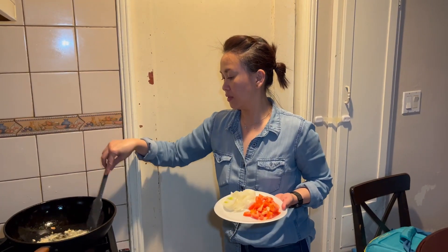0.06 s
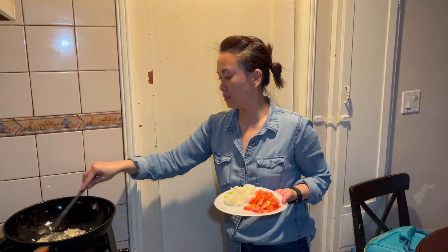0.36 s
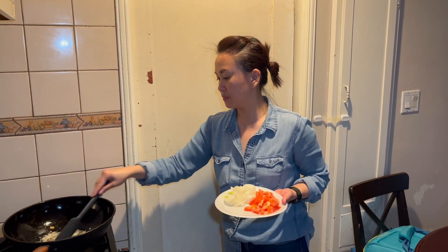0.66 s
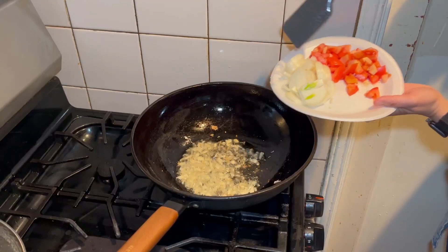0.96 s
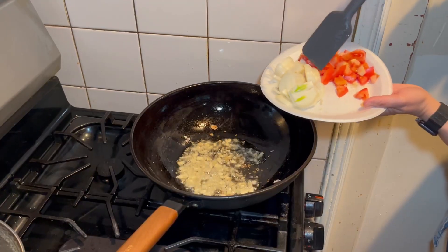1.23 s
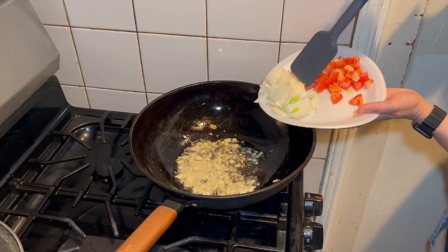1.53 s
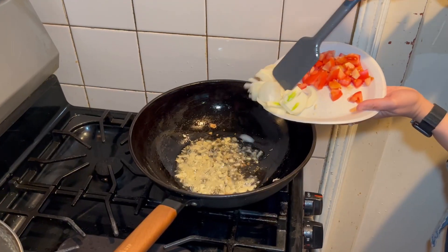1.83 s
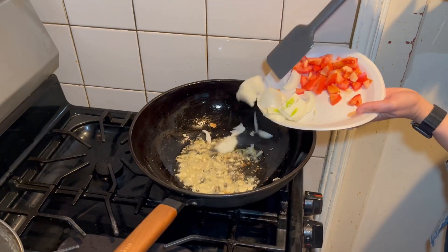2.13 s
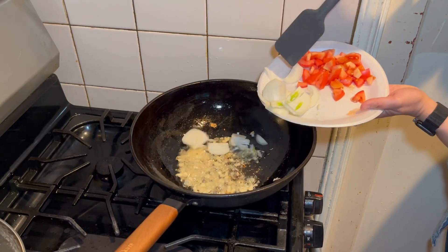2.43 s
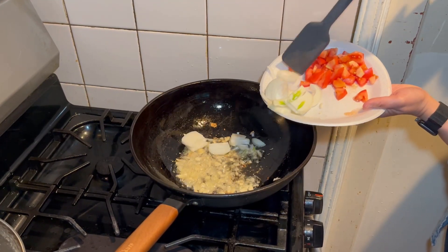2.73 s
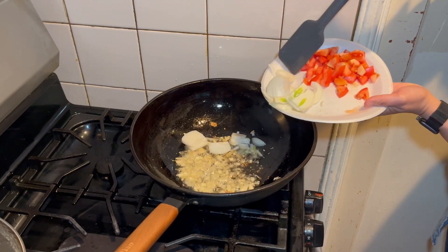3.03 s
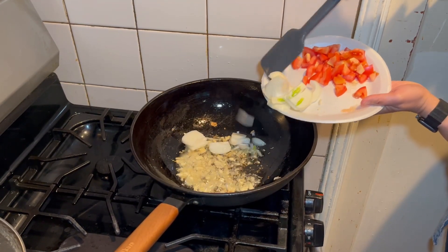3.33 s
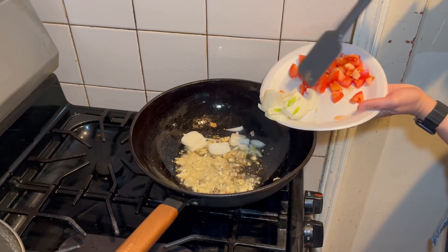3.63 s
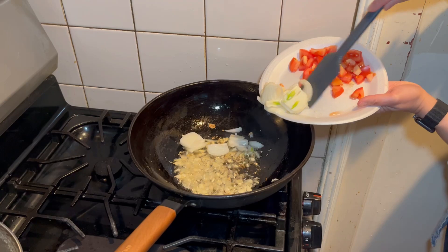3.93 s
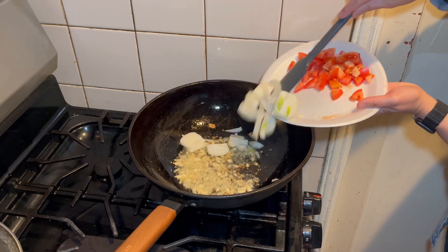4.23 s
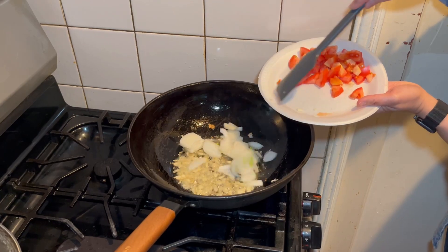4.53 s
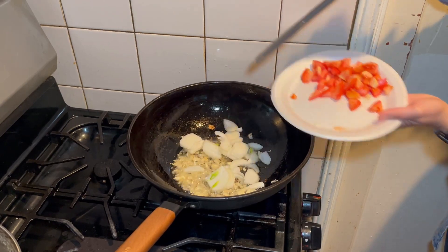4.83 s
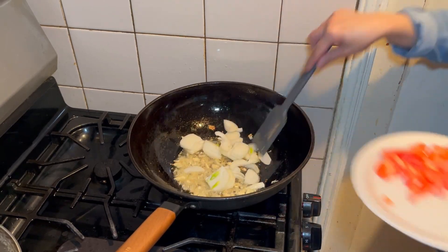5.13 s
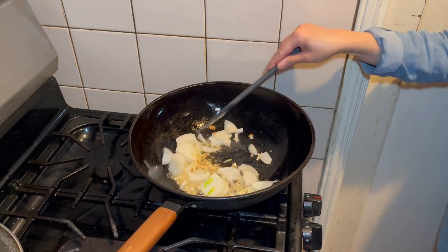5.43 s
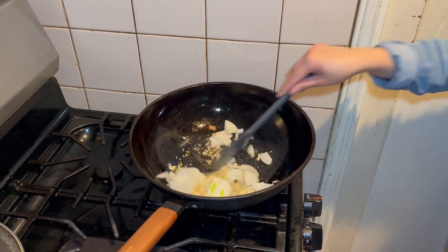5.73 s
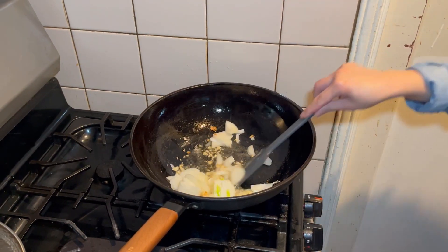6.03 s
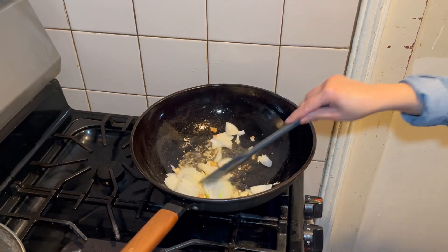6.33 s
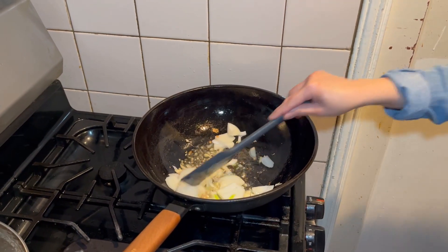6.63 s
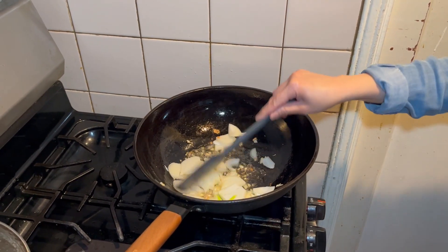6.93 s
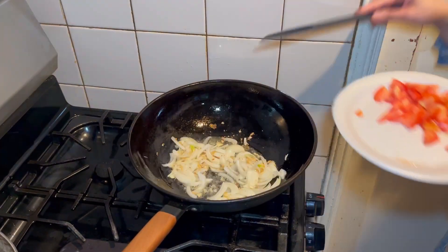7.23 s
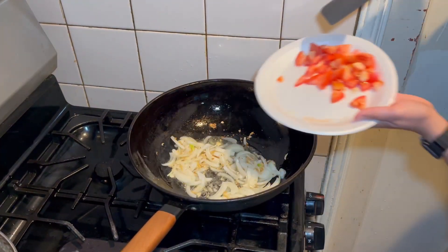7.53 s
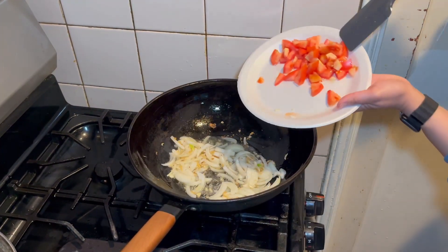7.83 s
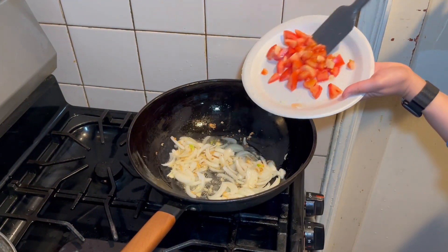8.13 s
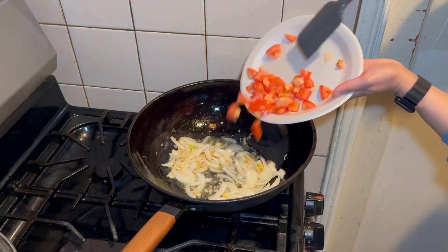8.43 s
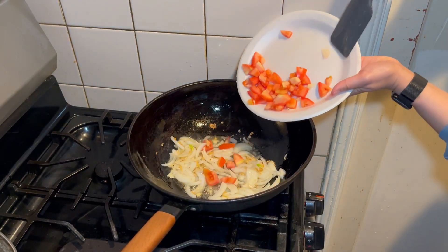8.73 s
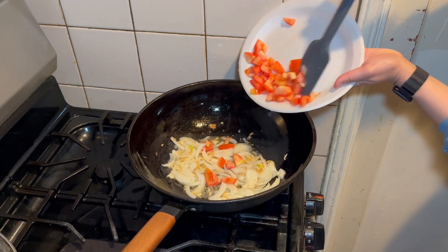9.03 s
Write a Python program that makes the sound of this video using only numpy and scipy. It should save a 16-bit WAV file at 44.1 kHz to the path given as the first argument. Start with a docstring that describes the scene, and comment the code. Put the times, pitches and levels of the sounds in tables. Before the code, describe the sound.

Garlic fizzes softly in a wok, then onion drops in and sizzles loudly with pops and spits as a spatula knocks and stirs.

```python
"""Garlic fizzes softly in a wok, close to a stereo microphone in a small tiled kitchen. Onion goes in at
2 s and the sizzle leaps up: water flashes to steam in the hot oil, with ringing pops and sharp spits.
An abrupt cut at 7.2 s leaves a quieter sizzle; tomato follows. A soft spatula knocks and pushes the food.
Underneath are the burner and, from outside, a rumble, a dull roar and a drone like an idling engine."""
import sys
import numpy as np
from scipy import signal
from scipy.fft import rfft, irfft, next_fast_len
from scipy.io import wavfile

SR = 44100
rng = np.random.default_rng(int(sys.argv[2]) if len(sys.argv) > 2 else 0)


def file_out(sig):
    """Save sig as 16-bit WAV at sys.argv[1]."""
    # one column per channel
    cols = np.atleast_2d(sig).T
    # limit, then scale
    lim = np.clip(cols, -1, 1)
    pcm = np.round(lim * 32767).astype(np.int16)
    wavfile.write(sys.argv[1], SR, pcm)


N = 399987
PADDED = next_fast_len(N + SR // 2)
FREQS = np.maximum(np.arange(PADDED // 2 + 1) * SR / PADDED, 1)

# Levels are relative: each source and the microphone add their own gain.
# spectrum of the frying: freq_hz, level_db
FRY_COLOUR = [(200, -6), (450, -10), (680, -11), (1050, -4), (1800, -3), (2350, -0.5), (3100, 0.5),
              (3750, 3), (5500, 1.6), (6800, 2), (9500, -3), (10800, -4.5), (12200, -9.5), (14000, -7),
              (15500, -21.5)]
# air resonances in the bowl of the wok: freq_hz, width_hz, gain_db
BOWL_RESONANCES = [(638, 45, 12.5), (763, 17, 6), (980, 41, 6), (1170, 80, -0.5), (2390, 130, 2.5),
                   (3766, 190, 3), (4940, 190, 3.5)]
# moist garlic, onion, then tomato meets hot oil: start_s, length_s, large_db, small_db, spray_db
WETTINGS = [ (0.0, 0.67, -75.5, -58, -61), (1.774, 0.38, -55, -55, -50), (2.047, 6.4, -41.5, -36, -40.5),
            (2.06, 0.6, -58, -57, -38), (2.29, 0.52, -41, -34, -41.5), (5.243, 0.32, -56, -57, -36),
            (5.747, 1.36, -41, -33, -39.5), (6.66, 0.5, -39, -49, -58), (8.5, 0.17, -60, -45, -43.5),
            (8.877, 0.18, -46, -35.5, -67)]
# steady sizzle of the garlic, and the sizzle after the abrupt cut: large_db, small_db, spray_db
GARLIC_DB, AFTER_CUT_DB = (-58, -52, -61), (-47.5, -39, -48)
# bubbles need time to grow, spray starts at once: large_s, small_s, spray_s
BUILD_S = (0.085, 0.069, 0.018)
DRY_OFF_S, CUT_S = 0.27, 7.224   # time constant of a dying flare; moment of the cut
# the largest steam bubbles bursting: start_s, level_db, pitch_hz, ring_cycles
POPS = [(0.9343, -31.5, 4230.0, 48), (2.2015, -22.0, 6400.0, 12.0), (2.4226, -19.5, 2480.0, 8.8),
        (2.506, -20, 5690.0, 22), (2.697, -20.5, 2400.0, 8.0), (2.7286, -27, 4230.0, 30),
        (2.7788, -20, 3980.0, 22), (2.7961, -10, 2660, 14), (2.8037, -15, 5700, 22),
        (2.909, -22.5, 3300, 22), (2.9438, -21.5, 2480.0, 8.8), (3.0504, -23, 5860.0, 30),
        (3.1004, -18.0, 3140.0, 12.0), (3.1701, -15.5, 3980.0, 8.0), (3.4724, -19, 4620.0, 12.0),
        (3.5433, -20.5, 3730, 18.0), (3.5692, -22, 5860.0, 22), (3.6974, -19, 2940, 22),
        (3.8061, -16, 5520.0, 12.0), (4.029, -24.0, 5050.0, 30), (4.0481, -24, 3750.0, 8.0),
        (4.0615, -22.5, 3540.0, 18.0), (4.1842, -22.0, 6800.0, 22), (4.2397, -26, 2480.0, 8.0),
        (4.2894, -22, 4760.0, 18.0), (4.5643, -26, 3640.0, 22), (4.6203, -23.0, 3750.0, 18.0),
        (4.6522, -13.5, 4300, 22), (4.849, -22, 4350.0, 30), (4.9414, -19.0, 3540.0, 12.0),
        (4.9984, -16.5, 5860.0, 18.0), (5.6697, -20, 6600.0, 18.0), (5.8216, -22, 3640.0, 22),
        (5.8598, -25.0, 3700, 30), (5.9233, -22.0, 3750.0, 30), (5.9285, -21, 3750.0, 30),
        (6.0767, -13, 3650, 29), (6.4898, -15, 5050.0, 18.0), (6.7836, -22.0, 3540.0, 24),
        (7.1118, -18.0, 3640.0, 22), (7.3473, -20.5, 4350.0, 12.0), (7.413, -20.5, 4230.0, 30),
        (7.4215, -26, 3900, 14), (7.602, -22, 6200, 30), (7.6033, -24, 4600, 21), (7.671, -24, 6400.0, 30),
        (7.722, -20.5, 3640.0, 18.0), (7.843, -26, 3750.0, 30), (7.9222, -28, 4100.0, 12.0),
        (8.0321, -27.0, 4100.0, 22), (8.0605, -22.5, 3750.0, 30), (8.189, -19.5, 5760, 22),
        (8.2314, -24, 5690.0, 30), (8.3939, -22.5, 4230.0, 22), (8.9123, -23, 4230.0, 22),
        (8.931, -27.0, 4600, 33), (8.9821, -19, 4200, 33), (9.0468, -21.5, 5360.0, 22)]
# oil spitting: start_s, level_db
SPITS = [(0.0845, -33), (0.6779, -34.0), (1.0204, -33), (1.8669, -24), (1.9119, -32.5), (1.9805, -26),
         (2.0623, -16.5), (2.1029, -11), (2.1878, -19), (2.2063, -13.5), (2.214, -17), (2.2212, -16),
         (2.2306, -12), (2.3427, -10), (2.4813, -11), (2.5395, -9), (2.5563, -12), (2.5968, -11),
         (2.723, -11), (2.7787, -15.0), (2.844, -17.0), (2.9241, -15.0), (3.015, -6.5), (3.0997, -19),
         (3.1773, -13), (3.1899, -17), (3.3426, -13.0), (3.3728, -16), (3.3773, -13), (3.482, -10.5),
         (3.5143, -12), (3.6344, -9.5), (3.772, -12.5), (3.7847, -15), (3.8059, -19.0), (3.8273, -16),
         (3.837, -9), (4.0061, -18), (4.0617, -15), (4.0788, -18.0), (4.1994, -14), (4.3483, -20),
         (4.4786, -12.0), (4.6641, -11.5), (4.721, -13), (4.8478, -13.5), (4.8711, -17.0), (5.1152, -16.5),
         (5.4583, -12), (5.5721, -10.5), (6.2707, -16), (6.6151, -10), (6.6898, -15.0), (6.838, -8.5),
         (6.872, -14), (6.9395, -15), (7.049, -14), (7.114, -13), (7.1597, -8.0), (7.1848, -9.5),
         (7.5682, -27), (7.8254, -18), (7.9589, -22), (8.4476, -23.0)]
# a wet patch touches the oil: start_s, length_s, level_db, pitch_hz
FLURRIES = [(0.065, 0.06, -46, 6000), (0.15, 0.12, -48.5, 5000), (0.44, 0.069, -50, 4800),
            (0.56, 0.08, -53, 5200), (0.66, 0.08, -54, 5000), (1.08, 0.04, -50, 5500),
            (2.414, 0.033, -38, 2650), (2.467, 0.057, -28.5, 5800), (2.72, 0.031, -46, 2600),
            (3.1, 0.093, -34.5, 2900), (3.463, 0.041, -37, 4000), (3.756, 0.063, -35.5, 2780),
            (4.023, 0.059, -32.5, 3600), (4.387, 0.043, -31, 5800), (4.548, 0.033, -41, 2730),
            (4.713, 0.029, -35, 2800), (4.939, 0.04, -41, 2600), (5.004, 0.056, -35, 3020),
            (6.25, 0.52, -33.5, 4150), (6.678, 0.42, -39, 4100), (8.612, 0.06, -38, 4400)]
# spatula touching wok or plate: start_s, level_db, pitch_hz
KNOCKS = [(0.2185, -28, 1800), (1.6158, -35, 3000), (2.5975, -28.5, 1110.0), (2.9159, -23.5, 950.0),
          (3.0496, -26, 1680), (3.657, -25, 1230.0), (3.9173, -22, 1230.0), (3.9224, -23, 1590.0),
          (4.0621, -24.0, 2160.0), (4.155, -26.5, 1290.0), (4.2726, -29, 1590.0), (4.4034, -26.5, 2160.0),
          (4.4417, -25, 1170.0), (4.4785, -25, 1850.0), (4.53, -32, 1170.0), (5.033, -25, 1760.0),
          (5.8602, -25, 1760.0), (6.439, -25, 1670.0), (6.782, -21, 1360.0), (7.1821, -15, 1850.0)]
# soft pieces landing or being shoved: start_s, level_db, pitch_hz
THUDS = [(2.668, -35, 380), (2.912, -33, 340), (3.001, -37, 318), (3.188, -31, 400), (4.255, -31.5, 280),
         (4.315, -37, 540), (4.452, -38, 510), (4.54, -31, 240), (4.55, -37, 520), (5.92, -30, 170),
         (5.96, -34, 145), (6.015, -31, 550), (6.06, -35, 550)]
# modes of the loaded wok: pitch_hz, level_db, t60_s
WOK_MODES = [(136, -3.5, .09), (235, -1, 0.062), (370, -1, 0.05), (443, -4, .04), (550, -2, 0.042),
             (617, -5, 0.06), (946, -6, .05)]
# spatula sliding over wok or plate: start_s, length_s, level_db
SCRAPES = [(0.22, 0.058, -44), (1.228, 0.018, -43), (1.526, 0.059, -44.5), (1.607, 0.028, -44),
           (1.64, 0.66, -55.5), (5.919, 0.036, -30.5), (5.967, 0.13, -36), (7.195, 0.027, -36)]
# spectrum of the sliding blade: freq_hz, level_db
SCRAPE_COLOUR = [(250, -3), (700, -1), (1400, -4), (1800, 2), (2300, -3), (4200, 0), (6000, -14),
                 (12000, -13)]
# spectrum of the burner: freq_hz, level_db
BURNER_COLOUR = [(50, -16), (140, 0), (175, -4.5), (225, 2.5), (300, -6), (420, -6), (800, -6.5),
                 (1400, -11), (2500, -18.5), (8000, -25.5)]
# engine drone outside: time_s, pitch_hz, level_db
DRONE_CURVE = [(1.0, 80, -43), (2.6, 79.3, -44.5), (3.35, 76, -35.5), (4.55, 75, -33.5), (5.08, 73.6, -42),
               (5.5, 73.3, -32), (6.1, 72.4, -43.5), (7.2, 72, -41.5), (8.0, 77, -45), (9.07, 71, -37.5)]
# spectrum of the deep rumble: freq_hz, level_db
RUMBLE_COLOUR = [(20, -28), (35, -10), (50, 3), (65, 0), (85, -6), (120, -23.5), (250, -39)]
# the rumble swells as food lands or is shoved: start_s, length_s, level_db
RUMBLE_SWELLS = [(1.976, 0.39, -40), (2.636, 0.92, -42), (4.515, 0.076, -38), (5.95, 0.083, -37.5)]
# roar like passing traffic: time_s, level_db
ROAR_CURVE = [(0, -54.5), (7.21, -51.5), (7.25, -39), (7.7, -39), (8.0, -38), (8.35, -42), (9.07, -39.5)]
# spectrum of the roar: freq_hz, level_db
ROAR_COLOUR = [(50, -7), (78, 10.5), (105, 1), (150, 0), (180, -8), (250, -2), (345, -8), (380, -4.5),
               (470, -12), (700, -13.5), (1500, -17.5), (4000, -32)]
# faint hum, against the level of the roar: pitch_hz, level_db
ROAR_TONES = [(199, -16), (311, -17), (452, -18.5)]
# echoes from wall, stove back and cupboards: delay_s, level_db
NEAR_ECHOES = [(.0023, -43), (.0041, -23), (.0067, -17), (0.01, -16.5), (0.014, -31)]
# level of the diffuse paths against the direct one: freq_hz, level_db
DIFFUSE_COLOUR = [(60, -20), (150, -11), (350, -3.5), (700, 0), (1450, 3), (2100, -6), (3000, -2),
                  (5300, -.5), (7000, -5), (8300, -15), (9600, -7), (12000, -13), (14000, -6)]
# right microphone port ahead of the left: freq_hz, lead_rad
PORT_PHASE = [(0, 0), (1900, -.1), (2900, -1.05), (4900, -.6), (5600, 1), (6600, 1.15), (8300, 3.14),
              (9000, 3.8), (10900, 5.5), (11300, 6.2), (12700, 6.5), (14400, 8.2), (15200, 9.4)]
# left port over the right: freq_hz, balance_db
PORT_BALANCE = [(60, 2), (380, 0.5), (700, 3), (1290, 0), (2380, 0), (4400, 4.5), (8100, 2.5),
                (11000, -0.5), (15000, 0)]


def sizzle(levels, trims_db=(-1, 0, 2), snap_db=-4.5, hiss_db=-4, smear_s=0.0048):
    """Water meets hot oil close to the microphone: bubbles, dry snaps and steam hiss, in three paths."""
    fizz = bubbles(per_s=7500, cycles=13.2)
    snaps = np.diff(clicks(per_s=1300, spread_db=0, largest=2.6), prepend=0)
    fizz += from_db(snap_db) * rms_one(snaps)
    fizz += from_db(hiss_db) * rng.standard_normal(N)
    fizz *= from_db(0.5 * drift(20))
    bowl_db = sum(db / (1 + (2 * (FREQS - hz) / width) ** 2) for hz, width, db in BOWL_RESONANCES)
    colour = gains(FRY_COLOUR) * from_db(bowl_db)
    above_large = 1 / (1 + (3200 / FREQS) ** 12)
    above_small = 1 / (1 + (8600 / FREQS) ** 8)
    bands = [1 - above_large, above_large - above_small, above_small]   # large, small, spray
    pole, out = np.exp(-1 / (smear_s * SR)), 0
    white = rng.standard_normal((2, N))
    for band, level, trim_db in zip(bands, levels, trims_db):
        grains = rms_one(filtered(fizz, band * colour)) * from_db(1.4 * drift(23.5))
        # every bubble has its own echo paths, so the reflections blur into a wash that trails the grains
        trail = np.sqrt(signal.lfilter([1 - pole], [1, -pole], grains ** 2))
        wash = trail * rms_one(filtered(white, band * colour))
        out = out + level * from_db(trim_db) * np.vstack([grains, wash])
    return out


def frying_levels():
    """Gains of large bubbles, small bubbles and spray: each wetting flares; the cut ends earlier ones."""
    after_cut = np.arange(N) / SR >= CUT_S
    power = np.where(after_cut, from_db(AFTER_CUT_DB)[:, None], from_db(GARLIC_DB)[:, None]) ** 2
    for s, length, *db in WETTINGS:
        flare = swell(s, length, np.array(BUILD_S)[:, None], DRY_OFF_S) * (after_cut == (s >= CUT_S))
        power += (from_db(db)[:, None] * flare) ** 2
    return np.sqrt(power)


def bubbles(per_s, cycles):
    """Bubbles of many sizes ring for a few cycles each."""
    births = np.diff(clicks(per_s, spread_db=4, largest=4), prepend=0)
    pitches = np.geomspace(650, 15000, 19)
    size = rng.integers(0, len(pitches), N)
    rings = (np.sqrt(hz) * rms_one(ring(births * (size == k), hz, cycles / hz))
             for k, hz in enumerate(pitches))
    return rms_one(sum(rings))


def pops(boil, gain_db=1, opening_share=0.12, pitch_rise=0.22, tear_t60_s=0.004, spray_t60_s=0.06):
    """A big bubble tears open and rings, rising in pitch as it empties; a puff of spray follows."""
    out, t = np.zeros(N), np.arange(SR // 8) / SR
    for s, db, hz, cycles in POPS + chance_pops(boil):
        age = np.minimum(t * hz / cycles, 2)   # in ring lengths
        envelope = from_db(-60 * age) * (1 - np.exp(-age / opening_share))
        pitch = hz * (1 + pitch_rise * (age - 2 * opening_share))
        cavity = envelope / envelope.max() * sine(pitch)
        spray = rms_one(band_around(rng.standard_normal(len(t)), hz, octaves=0.58, order=1))
        spray *= from_db(-3.5 - 60 * t / tear_t60_s) + from_db(-21 - 60 * t / spray_t60_s)
        add(out, s, from_db(db + gain_db) * (cavity + spray))
    return out


def chance_pops(boil, per_s=3.2, over_db=8, scatter_db=1.5, middle_hz=4320, scatter_octaves=0.41):
    """Lesser bubbles burst at random, following the strength of the frying; rows as in POPS."""
    at = np.flatnonzero(rng.random(N) < per_s / SR)
    strength, size = rng.standard_normal((len(at), 2)).T
    db = 20 * np.log10(boil[at]) + over_db + scatter_db * strength
    hz = middle_hz * 2 ** (scatter_octaves * size)
    ring_cycles = np.full(len(at), 12)
    return list(zip(at / SR, db, hz, ring_cycles))


def spits(gain_db=8.5):
    """Droplets explode with a bright snap and a short spray."""
    out = np.zeros(N)
    for s, db in SPITS:
        add(out, s, from_db(db + gain_db) * burst(tail_db=-18, tail_t60_s=0.026))
    return filtered(out, gains([(400, -15), (2500, -5), (6000, -0.5), (10000, 1.5), (15000, -3.5)]))


def flurries():
    """A patch of moisture boils away in a quick run of bubbles of like size."""
    grains, out = bubbles(per_s=2600, cycles=11), np.zeros(N)
    for s, length, db, hz in FLURRIES:
        run = band_around(grains[int(s * SR):int((s + length) * SR)], hz, octaves=0.38, order=2)
        add(out, s, from_db(db) * rms_one(run) * np.hanning(len(run)) ** .25)
    return out


def crackles(start_s=2.16, length_s=3.2, gain_db=-10):
    """Drops from the raw onion burst in the oil as lone dry cracks."""
    cracks = butter(clicks(per_s=26, spread_db=2.5, largest=2.3), 1, [1600, 6000], "band")
    return from_db(gain_db) * swell(start_s, length_s, BUILD_S[1], DRY_OFF_S) * cracks


def stirring(knock_db=7, knock_cycles=4, tap_db=-18, thud_db=-49.5, wok_db=-37, landing_s=0.012):
    """The spatula gives short dry knocks; these and the tumbling food set the damped wok ringing."""
    knocks, blows = np.zeros(N), np.zeros(N)
    for s, db, hz in KNOCKS:
        contact = from_db(db + knock_db) * burst(tail_db=-37, tail_t60_s=0.015)
        add(knocks, s, ring(contact, hz, knock_cycles / hz) + from_db(tap_db) * contact)
        add(blows, s, from_db(wok_db) * contact)
    for s, db, hz in THUDS:
        patter = burst(tail_db=-11.5, tail_t60_s=0.19)
        patter *= np.minimum(np.arange(len(patter)) / (landing_s * SR), 1)   # pieces arrive one by one
        thud = np.diff(ring(patter, hz, t60_s=0.02)) * SR / (2 * np.pi * hz)
        add(blows, s, from_db(db + thud_db) * thud)
    blade = butter(knocks, 1, 450, "high")   # the light blade radiates no bass
    wok = sum((-1) ** k * from_db(db) * ring(blows, hz, t60) for k, (hz, db, t60) in enumerate(WOK_MODES))
    return blade + wok


def scrapes():
    """The blade sticks and slips in dense little clicks, fading as the stroke slows."""
    slips = filtered(clicks(per_s=2500, spread_db=2, largest=3.1), gains(SCRAPE_COLOUR))
    strokes = np.zeros(N)
    for s, length, db in SCRAPES:
        add(strokes, s, from_db(db) * np.sqrt(np.linspace(1, 0, int(length * SR))))
    return strokes * rms_one(slips)


def burner(gain_db=-50.5):
    """The burner rushes steadily under the wok."""
    return from_db(gain_db) * noise(BURNER_COLOUR)


def engine_drone(gain_db=-1, waver_db=2, waver_hz=0.7):
    """One low, wavering tone fades in, like an engine idling outside."""
    hz, db = in_time(DRONE_CURVE)
    fade_in = np.clip(np.arange(N) / SR / DRONE_CURVE[0][0], 0, 1) ** 8
    tone = np.sqrt(2) * sine(hz + waver_hz * drift(7.4))
    return direct_only(fade_in * from_db(db + gain_db + waver_db * drift(3.2)) * tone)


def rumble(gain_db=2.5, start_db=-50.5, steady_db=-46.5, rise_s=1.9):
    """A deep rumble comes up to a steady level and swells when the food moves."""
    steady = from_db(np.interp(np.arange(N) / SR, [0, rise_s], [start_db, steady_db]))
    swell_power = sum((from_db(db) * swell(s, length, rise_s=0.015, fall_s=0.069)) ** 2
                      for s, length, db in RUMBLE_SWELLS)
    return from_db(gain_db) * np.sqrt(steady ** 2 + swell_power) * noise(RUMBLE_COLOUR)


def roar(waver_hz=3.004):
    """A dull roar like traffic passing outside, with a hum of low tones that wander in pitch."""
    rush = noise(ROAR_COLOUR)
    hum = np.sqrt(2) * sum(from_db(db) * sine(hz + waver_hz * drift(5.83)) for hz, db in ROAR_TONES)
    return from_db(in_time(ROAR_CURVE)[0]) * (rush + direct_only(hum))


def kitchen(x, gap_s=0.0035, early_t60_s=0.021, late_t60_s=0.18, late_db=-11.5):
    """Three paths: direct sound, then left and right reflections off wok and tiles with a short tail."""
    t = np.arange(SR // 2) / SR - gap_s
    decay = (from_db(-60 * t / early_t60_s) + from_db(late_db - 60 * t / late_t60_s)) * (t > 0)
    echoes = rng.standard_normal((2, len(t))) * decay / np.sqrt(np.sum(decay ** 2))
    return np.vstack([x, filtered(x, rfft(echoes, PADDED))])


def from_db(db):
    """Decibels to gain."""
    return 10 ** (np.asarray(db) / 20)


def rms_one(x):
    """Scale to unit power."""
    return x / np.sqrt(np.mean(x ** 2) + 1e-20)


def in_time(rows):
    """Each column of a curve, sample by sample."""
    s, *columns = np.transpose(rows)
    return [np.interp(np.arange(N) / SR, s, c) for c in columns]


def gains(points):
    """Rows of freq_hz, level_db as a gain at every frequency."""
    hz, db = np.transpose(points)
    return from_db(np.interp(np.log(FREQS), np.log(hz), db))


def filtered(x, response):
    """Pass a signal through a frequency response."""
    return irfft(rfft(x, PADDED) * response, PADDED)[..., :N]


def butter(x, order, hz, kind):
    """A filter with a flat passband."""
    return signal.sosfilt(signal.butter(order, hz, kind, fs=SR, output="sos"), x + 1e-18)


def band_around(x, hz, octaves, order):
    """Pass so many octaves either side of a pitch."""
    edges = np.clip(hz * 2 ** (octaves * np.array([-1, 1])), 10, .45 * SR)
    return butter(x, order, edges, "band")


def noise(colour):
    """Coloured noise of unit power, in three paths: direct, diffuse left, diffuse right."""
    return rms_one(filtered(rng.standard_normal((3, N)), gains(colour)))


def direct_only(x):
    """Three paths with the two diffuse ones silent."""
    return x * np.array([[1], [0], [0]])


def drift(rate_hz, step=40, settle=2000):
    """Slow random wander with spread 1: coarse noise, smoothed twice."""
    r = np.exp(-2 * np.pi * rate_hz * step / SR)
    coarse = rng.standard_normal(N // step + settle + 2)
    slow = signal.lfilter([1], [1, -2 * r, r * r], coarse)[settle:]
    return np.interp(np.arange(N) / step, np.arange(len(slow)), rms_one(slow))


def sine(hz):
    """A sine that follows a pitch curve."""
    return np.sin(2 * np.pi * np.cumsum(hz) / SR)


def ring(x, hz, t60_s):
    """A unit click sets a sine of height 1 ringing."""
    r, w = from_db(-60 / (t60_s * SR)), 2 * np.pi * min(hz, .45 * SR) / SR
    return signal.lfilter([0, np.sin(w)], [1, -2 * r * np.cos(w), r * r], x + 1e-18)


def clicks(per_s, spread_db, largest):
    """Random clicks, many small and a few large, up to `largest` spreads above the smallest."""
    born = np.flatnonzero(rng.random(N) < per_s / SR)
    size = np.minimum(rng.exponential(1, len(born)), largest)
    out = np.zeros(N)
    out[born] = from_db(spread_db * size) * rng.choice([-1, 1], len(born))
    return out


def burst(tail_db, tail_t60_s):
    """A click with a dying puff of noise behind it."""
    t = np.arange(SR // 4) / SR
    out = from_db(tail_db - 60 * t / tail_t60_s) * rng.standard_normal(len(t))
    out[0] = 1
    return out


def swell(start_s, length_s, rise_s, fall_s):
    """An envelope that builds, holds and dies away."""
    age = np.maximum(np.arange(N) / SR - start_s, 0)
    return (1 - np.exp(-age / rise_s)) * np.exp(-np.maximum(age - length_s, 0) / fall_s)


def add(track, s, sound):
    """Mix a short sound in at a time."""
    start = int(np.clip(round(s * SR), 0, N - 1))
    track[start:start + len(sound)] += sound[:N - start]


def scene():
    """Wok and background reach two spaced microphone ports as direct and diffuse sound."""
    large, small, spray = frying_levels()
    paths = sizzle([large, small, spray])
    paths += engine_drone() + rumble() + roar() + burner()
    paths += kitchen(pops(small) + flurries() + crackles() + spits() + stirring() + scrapes())
    mirrored = sum(from_db(db) * np.exp(-2j * np.pi * FREQS * s) for s, db in NEAR_ECHOES)
    mirrored *= gains([(100, -70), (700, -1), (5000, -2), (10000, 0)])   # small surfaces mirror no bass
    diffuse = gains(DIFFUSE_COLOUR)
    heard = (1 + mirrored) / np.sqrt(1 + diffuse ** 2)   # direct and diffuse sound share the power
    lead_rad = np.interp(FREQS, *np.transpose(PORT_PHASE))
    direct = filtered(paths[0], heard * np.exp(.5j * lead_rad * np.array([[-1], [1]])))
    return direct + filtered(paths[1:], heard * diffuse)


def record(dry, gain_db=1.5, cutoff_hz=15650):
    """The microphone's left port is a little louder; the top is cut steeply."""
    ports = from_db(gain_db) * filtered(dry, gains(PORT_BALANCE) ** np.array([[.5], [-.5]]))
    return signal.sosfilt(signal.ellip(12, .1, 80, cutoff_hz, fs=SR, output="sos"), ports)


dry = scene()
out = record(dry)
file_out(out)
```